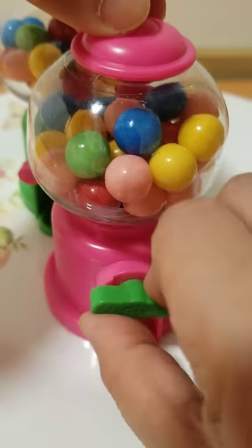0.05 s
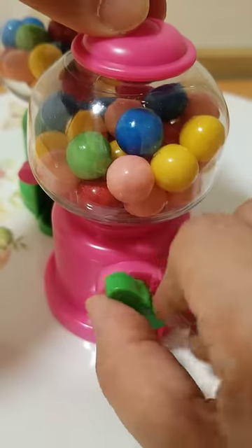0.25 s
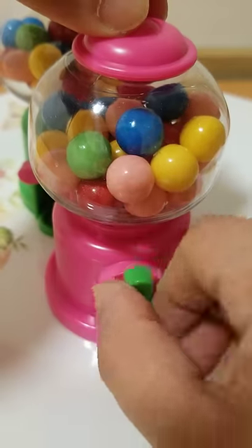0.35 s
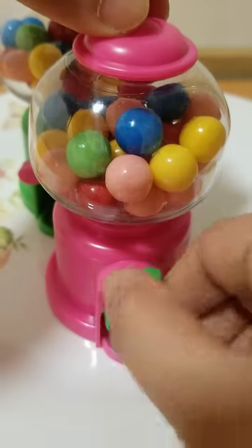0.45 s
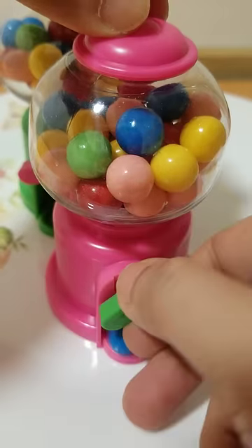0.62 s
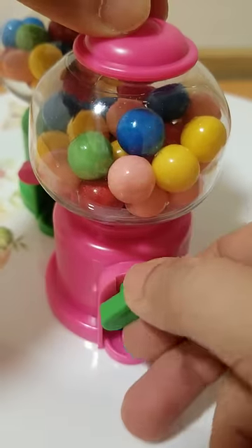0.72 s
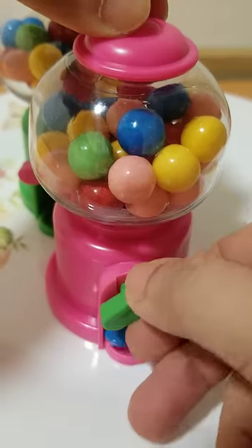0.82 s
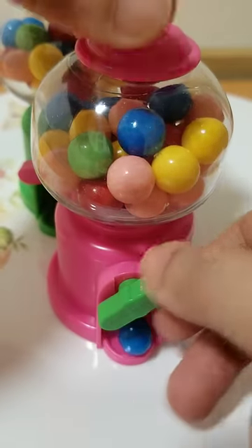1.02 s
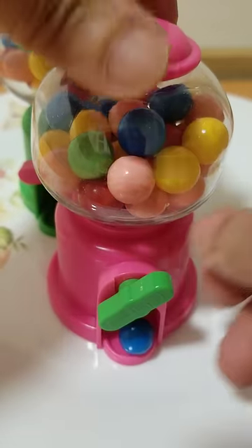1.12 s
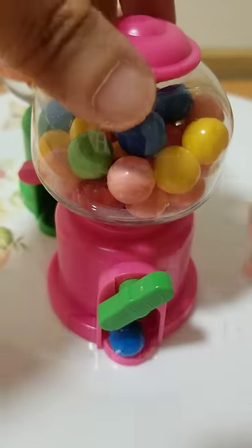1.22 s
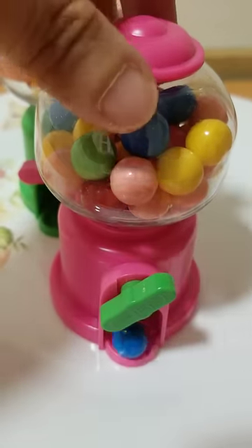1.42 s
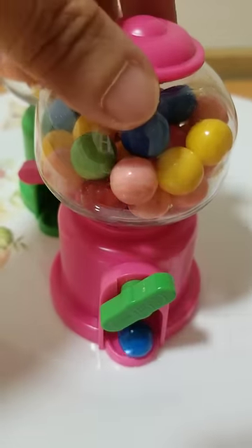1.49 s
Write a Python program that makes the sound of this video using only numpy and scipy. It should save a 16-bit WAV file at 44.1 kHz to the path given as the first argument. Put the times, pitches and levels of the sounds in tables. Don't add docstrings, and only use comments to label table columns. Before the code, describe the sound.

A plastic knob on a small toy dispenser clicks and ratchets sharply, dropping a rattling ball

```python
import sys
import numpy as np
from scipy import signal
from scipy.fft import rfft, irfft
from scipy.io import wavfile
from scipy.ndimage import uniform_filter1d

SR = 44100
rng = np.random.default_rng(int(sys.argv[2]) if len(sys.argv) > 2 else 0)


def digitize_waveform(pressure):
    field = np.atleast_2d(pressure).T
    bounded = np.clip(field, -1, 1)
    quanta = np.round(bounded * 32767).astype(np.int16)
    wavfile.write(sys.argv[1], SR, quanta)


def gain_from_db(level_db):
    decades = np.asarray(level_db, float) / 20
    return 10 ** decades


N = 68355
SPLIT_HZ = 7000

# (frequency [Hz], level [dB], t60 [s])
BODY_MODES = [(1107, -11.5, 0.097), (1299, -9, 0.063), (1850, -24.5, 0.0067), (2277, -5.5, 0.032),
              (3230, -2.5, 0.12), (3670, -8, 0.059), (3723, -7.5, 0.059), (4850, -15.5, 0.048),
              (5190, -13, 0.028), (6503, 1, 0.029), (8845, -6.5, .015), (9930, 3, 0.0079), (10850, 2, .012),
              (11940, -1.5, 0.013)]


def level(x, db):
    return x * gain_from_db(db) / np.sqrt(np.mean(x ** 2))


def curve(rows):
    time_s, level_db = np.array(rows, float).T
    return gain_from_db(np.interp(np.arange(N) / SR, time_s, level_db))


def band(x, hz, width_hz):
    return signal.lfilter(*signal.iirpeak(hz, hz / width_hz, fs=SR), x)


def drone():
    # (time [s], level [dB])
    drone_rows = [(0.0, -58.5), (0.038, -65), (0.076, -63), (0.158, -50), (0.72, -53), (0.764, -61.5),
                  (0.932, -50), (0.974, -57), (1.022, -49.5), (1.256, -57), (1.312, -44), (1.55, -64)]
    centre_hz, wander_hz = 98.2, 3.8
    drift = uniform_filter1d(rng.standard_normal(N), SR // 20)
    pitch_hz = centre_hz + wander_hz * drift / drift.std()
    return np.sqrt(2) * np.sin(2 * np.pi * np.cumsum(pitch_hz) / SR) * curve(drone_rows)


def air():
    # (frequency [Hz], level [dB per Hz])
    air_rows = [(20, -2.5), (100, -8.5), (520, -18.5), (800, -34), (1300, -41), (1700, -53.5), (5000, -56),
                (14000, -50.5)]
    # (frequency [Hz], width [Hz], level [dB])
    hum_lines = [(147.3, 10, -61), (191.5, 9.6, -59)]
    air_db, pan_db, apart_hz = -53, 1.1, 573
    hz = np.fft.rfftfreq(N, 1 / SR) + 1
    row_hz, row_db = np.array(air_rows, float).T
    shape = gain_from_db(np.interp(np.log(hz), np.log(row_hz), row_db))
    mid = rfft(rng.standard_normal(N)) * shape
    side = rfft(rng.standard_normal(N)) * shape
    side = side * hz / np.hypot(hz, apart_hz)
    noise = level(irfft(np.array([mid + side, mid - side]), N), air_db)
    hum = sum(level(band(rng.standard_normal(N), f, w), db) for f, w, db in hum_lines)
    return (noise + hum + drone()) * gain_from_db(np.array([[pan_db], [-pan_db]]) / 2)


def table():
    # (time [s], level [dB])
    thrum_rows = [(0, -63.5), (.125, -57), (.137, -43.5), (.33, -59), (.36, -52), (.44, -46.5), (.49, -60),
                  (.54, -47), (.63, -59.5), (.68, -51), (.85, -56.5), (1.2, -65.5), (1.55, -89)]
    thrum_hz, thrum_width_hz = 285.9, 28
    rustle_hz, rustle_width_hz, rustle_db = 611, 320, -7
    thrum = band(rng.standard_normal(N), thrum_hz, thrum_width_hz)
    thrum = band(thrum, thrum_hz, thrum_width_hz)
    rustle = rng.standard_normal(N) + rng.standard_normal((2, N))
    for width_hz in (rustle_width_hz, rustle_width_hz, 2 * rustle_width_hz):
        rustle = band(rustle, rustle_hz, width_hz)
    return (level(thrum, 0) + level(rustle, rustle_db)) * curve(thrum_rows)


def room(x):
    tail_db, t60_s, top_t60_s, gap_s = -5, 0.39, 0.27, 0.001
    t = np.arange(SR // 2) / SR
    noise = rng.standard_normal((2, len(t)))
    low = signal.sosfilt(signal.butter(2, 5000, fs=SR, output="sos"), noise)
    tail = low * gain_from_db(-60 * t / t60_s) + (noise - low) * gain_from_db(-60 * t / top_t60_s)
    tail *= 1 - np.exp(-t / gap_s)
    tail *= gain_from_db(tail_db) / np.sqrt((tail ** 2).sum() / 2)
    return signal.fftconvolve(x, tail, axes=1)[:, :N]


def ports(x):
    # (frequency [Hz], both ports [dB], left minus right [dB])
    port_rows = [(300, -0.5, -15), (696, 3, -7.5), (1420, 1, -2), (5100, 0.5, -2.5), (7000, -7.5, 1.5),
                 (9200, -4, 6.5), (11660, -1, 6), (14400, -4, 10.5)]
    hz, both_db, pan_db = np.array(port_rows, float).T
    at = np.log(np.fft.rfftfreq(N, 1 / SR) + 1)
    both_db = np.interp(at, np.log(hz), both_db)
    pan_db = np.interp(at, np.log(hz), pan_db)
    return irfft(rfft(x) * gain_from_db(np.array([both_db + pan_db / 2, both_db - pan_db / 2])), N)


def drag(bands):
    total = 0
    for hz, width_hz, db in bands:
        noise = rng.standard_normal((2, N))
        total = total + level(band(band(noise, hz, width_hz), hz, width_hz), db)
    return level(total, 0)


def settle():
    # (time [s], level [dB])
    settle_rows = [
        (.03, -103.5),
        (.056, -63.5),
        (.075, -73),
        (.1, -72),
        (.125, -75),
        (.15, -95),
    ]
    # (frequency [Hz], width [Hz], level [dB])
    settle_bands = [(1160, 300, 2), (3240, 200, -10), (4860, 100, -14), (9200, 520, -4.5)]
    return drag(settle_bands) * curve(settle_rows)


def slip():
    # (time [s], level [dB])
    slip_rows = [
        (1.165, -108),
        (1.18, -82),
        (1.2, -68.5),
        (1.24, -82.5),
        (1.28, -70.5),
        (1.32, -100),
    ]
    # (frequency [Hz], width [Hz], level [dB])
    slip_bands = [(1090, 200, -2.5), (3210, 130, -3.5), (3665, 140, -3), (6450, 150, -12),
                  (9260, 90, -10.5), (9400, 200, -12)]
    return drag(slip_bands) * curve(slip_rows)


def grind():
    # (time [s], level [dB])
    grind_rows = [(.14, -95), (.157, -50), (.183, -58.5), (.195, -91), (.395, -93), (.41, -42), (.435, -50),
                  (.45, -40.5), (.5, -39), (.525, -48.5), (.545, -54), (.62, -96.5), (1.015, -87),
                  (1.032, -49), (1.045, -66), (1.1, -91)]
    # (frequency [Hz], width [Hz], level [dB])
    grind_bands = [(1110, 60, -9), (1247, 50, -12.5), (2070, 57, -6.5), (2850, 400, -3), (3156, 170, -1),
                   (3500, 84, -3.5)]
    return drag(grind_bands) * curve(grind_rows)


def snap(low_hz, treble_db, size=600):
    decay_s, apart, high_hz = 0.0014, 0.82, 14700
    noise = rng.standard_normal(size) + apart * rng.standard_normal((2, size))
    spectrum = rfft(noise * np.exp(-np.arange(size) / SR / decay_s))
    size_now = np.abs(spectrum)
    noise = irfft(spectrum * size_now.mean() / uniform_filter1d(size_now, size=7), size)
    low = signal.sosfilt(signal.butter(2, [low_hz, SPLIT_HZ], "band", fs=SR, output="sos"), noise)
    top = signal.sosfilt(signal.butter(2, [SPLIT_HZ, high_hz], "band", fs=SR, output="sos"), noise)
    return low - gain_from_db(min(treble_db, 3)) * top


def ring(modes, treble_db, size=4000):
    detune, scatter_db, crack_db, crack_s = 0.012, 3.5, 2.5, 0.0064
    hz, db, t60_s = np.repeat(np.array(modes, float), 3, axis=0).T[:, :, None]
    t = np.arange(size) / SR
    chance = rng.standard_normal((5, len(hz), 1))
    hz = hz * (1 + detune * chance[0])
    gain = gain_from_db(db + np.where(hz > SPLIT_HZ, treble_db, 0) + scatter_db * chance[1:3])
    fade = np.exp(-np.log(1000) * t / t60_s) + gain_from_db(crack_db) * np.exp(-np.log(1000) * t / crack_s)
    phase = 10 * np.repeat(chance[3:, ::3], 3, axis=1)
    return (gain * fade * np.sin(2 * np.pi * hz * t + phase)).sum(axis=1)


def rub():
    # (time [s], level [dB])
    rub_rows = [(0, -99), (.05, -81), (.13, -68), (.18, -56), (.22, -48), (.32, -56.5), (.36, -40),
                (.435, -49.5), (.52, -39.5), (.6, -46.5), (.67, -49.5), (.76, -61), (.82, -44), (.9, -54),
                (.98, -70), (1.1, -91)]
    ticks_per_s, spread_db, treble_db, snap_db = 2500, 7, -8, 22
    ticks = (rng.random(N) < ticks_per_s / SR) * rng.choice([-1, 1], N)
    ticks = ticks * gain_from_db(spread_db * np.minimum(rng.exponential(size=N), 3))
    tone = ring(BODY_MODES, treble_db) + gain_from_db(snap_db) * snap(920, treble_db, size=4000)
    return level(signal.fftconvolve(ticks[None], tone, axes=1), 0)[:, :N] * curve(rub_rows)


def hits(rows, modes):
    own_db, own_cycles, own_t60_s = 7.5, 55, 0.085
    treble_lift_db, chatter_s, snap_db = 8.5, 0.00044, -3
    snap_low_share, snap_low_hz = 0.71, 920
    contact_s, right_lag_s = 0.00033, 0.0004
    out = np.zeros((2, N + 8000))
    for s, db, hz, treble_db, pan_db in rows:
        own_mode = (hz, own_db, min(own_cycles / hz, own_t60_s))
        tone = ring([*modes, own_mode], treble_db + treble_lift_db)
        tone *= 1 - np.exp(-np.arange(tone.shape[1]) / SR / chatter_s)
        tone /= np.abs(tone).max(axis=1, keepdims=True)
        low_hz = max(snap_low_share * hz - snap_low_hz, snap_low_hz)
        tone[:, :600] += gain_from_db(snap_db) * snap(low_hz, treble_db)
        tone /= np.abs(tone).max(axis=1, keepdims=True)
        for port, (lag_s, sign) in enumerate([(0, 1), (right_lag_s, -1)]):
            i = int((s + contact_s + lag_s) * SR)
            out[port, i:i + tone.shape[1]] += tone[port] * gain_from_db(db + sign * pan_db / 2)
    return out[:, :N]


def short_knocks():
    # (time [s], peak level [dB], loudest ring [Hz], treble [dB], left minus right [dB])
    short_blows = [(0.0557, -55, 1130, -9.5, 11), (0.1313, -31, 1250, -9.5, 5), (0.5272, -15, 4480, 2, -6),
                   (.5288, -11, 5400, -16.5, 8), (.5312, -41.5, 1259, -19.5, 3.5), (.537, -30, 4460, -4, 20),
                   (.5548, -25.5, 5300, -19.5, -5), (0.5595, -23.5, 2750, -11, 14),
                   (0.6396, -18, 1617, -1.5, 3), (.6435, -35.5, 3500, -3, -9), (0.656, -20.5, 5550, -18, 5),
                   (0.663, -23.5, 5400, -10.5, 1), (.6645, -31.5, 1370, -6, 17),
                   (0.7821, -16.5, 4920, -7, 2.5), (0.798, -23.5, 3864, -25, 10.5),
                   (0.81, -25.5, 3500, -14, 8), (0.82, -35, 3900, -11, 13), (0.8429, -27, 2660, -14, 7),
                   (0.8538, -38.5, 2750, -37, 20), (0.8651, -24.5, 2786, -17, 5.5),
                   (0.8744, -32, 2620, -22, 5), (0.9514, -24.5, 3340, -10, 2), (0.96, -34, 4470, -3.5, 15),
                   (0.9677, -28.5, 4400, -19.5, 10.5), (0.9732, -30.5, 3660, -43, 1),
                   (.9545, -30.5, 3250, -16.5, 4), (.9705, -30, 4400, -25, 2)]
    # (frequency [Hz], level [dB], t60 [s])
    tray_modes = [(1130, -3.5, 0.04), (1306, 2.5, 0.011), (1880, -9.5, 0.059), (2117, -5.5, 0.021),
                  (2978, -3.5, 0.066), (3130, -6, 0.025), (3775, 4, 0.014), (4400, 0, 0.029),
                  (5120, -10, 0.017), (5580, -1.5, 0.016), (8580, 9, 0.0071), (9260, 11, 0.0035),
                  (10540, -11.5, 0.011), (11800, -11, .012)]
    return hits(short_blows, tray_modes)


def knob():
    # (time [s], peak level [dB], loudest ring [Hz], treble [dB], left minus right [dB])
    knob_blows = [
        (.182, -39.5, 3220, -4, 3.5),
        (.195, -28, 1415, -7, 5),
        (.2029, -15, 4780, -9.5, 12),
        (.2083, -14, 4770, -16, 3.5),
        (.2125, -24, 4860, -16, -3.5),
        (.221, -22, 4440, -17.5, -5),
    ]
    # (frequency [Hz], level [dB], t60 [s])
    knob_modes = [(1440, -3.5, 0.013), (2775, -10, 0.0349), (3220, -8, .03), (3920, -0.5, .04),
                  (5100, -17, .035), (5230, -11, .03), (5880, -11.5, .02), (7080, -1.5, .02),
                  (8720, 1, 0.01), (10800, -25.5, .015), (13600, -15, .02), (15000, -13, 0.01138)]
    return hits(knob_blows, knob_modes)


def ratchet():
    # (time [s], peak level [dB], loudest ring [Hz], treble [dB], left minus right [dB])
    ratchet_blows = [(0.3414, -32, 1310, -0.5, 4.4), (0.3556, -13, 1302, 4.5, 13.7),
                     (.3595, -23, 1290, 1, 6), (0.3671, -14.5, 6230, -14, 1.8),
                     (0.3728, -17, 3640, -5.5, 2), (.3755, -19, 6100, -13.5, 2),
                     (0.4048, -6.5, 5570, -8.5, 8.5), (.4068, -10.5, 3230, -13.5, 5),
                     (.4135, -26, 3500, -7.5, 4), (0.4405, -12, 3230, -8.5, 4.4),
                     (0.4633, -15.5, 3245, -4, 8.2), (.4695, -16, 3240, -15.5, 3),
                     (0.4832, -19, 3230, -13.5, 2), (0.494, -24.5, 3230, -13, 2.0)]
    return hits(ratchet_blows, BODY_MODES)


def scene():
    toy = knob() + ratchet() + short_knocks() + rub() + slip() + grind() + settle()
    thud = gain_from_db(-13) * band(np.abs(toy), 600, 540)
    return ports(toy + room(toy) + thud) + table() + air()


def low_pass(x):
    return signal.sosfilt(signal.butter(12, 16970, fs=SR, output="sos"), x)


def record(dry):
    top_cut = signal.ellip(6, 0.2, 24, 15900, fs=SR, output="sos")
    return low_pass(signal.sosfilt(top_cut, dry))


dry = scene()
out = record(dry)
digitize_waveform(out)
```